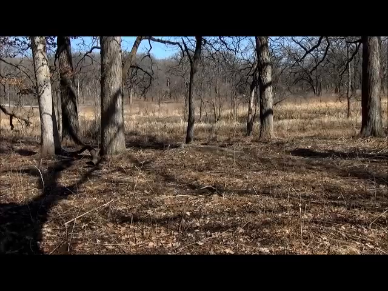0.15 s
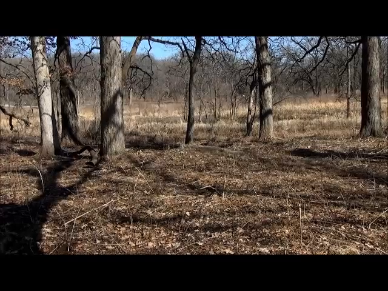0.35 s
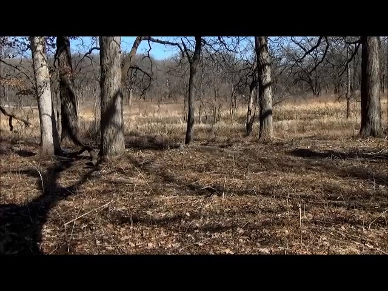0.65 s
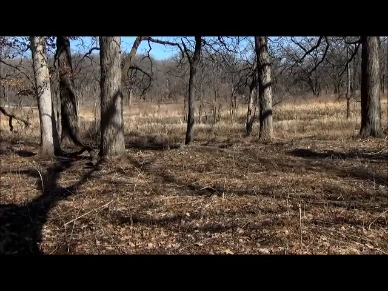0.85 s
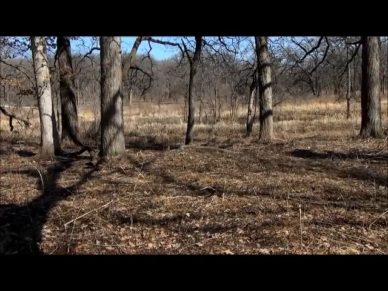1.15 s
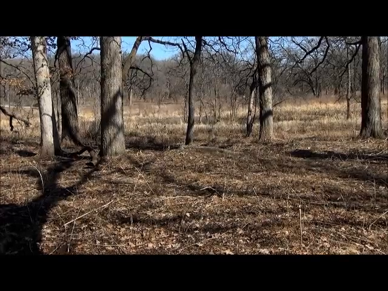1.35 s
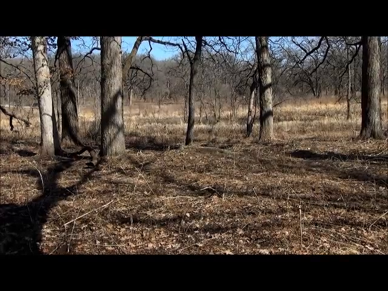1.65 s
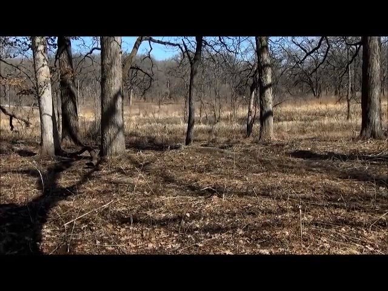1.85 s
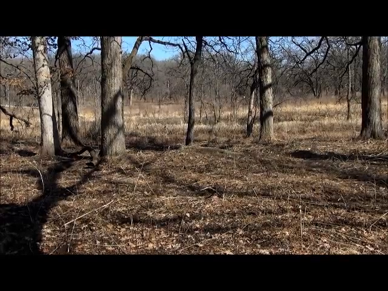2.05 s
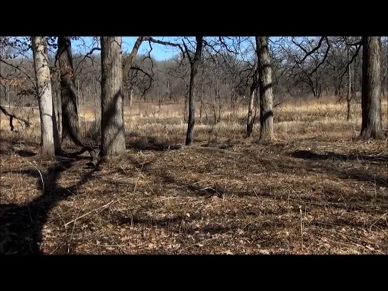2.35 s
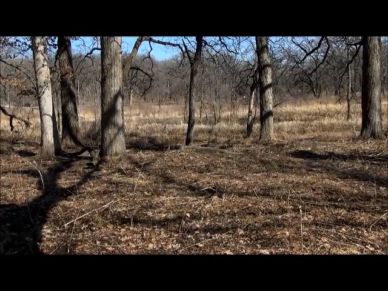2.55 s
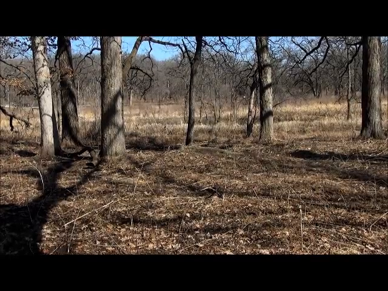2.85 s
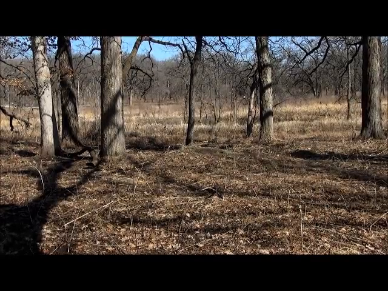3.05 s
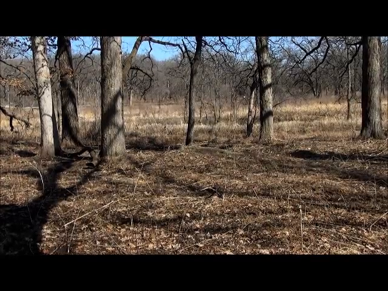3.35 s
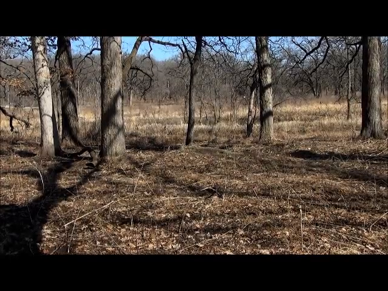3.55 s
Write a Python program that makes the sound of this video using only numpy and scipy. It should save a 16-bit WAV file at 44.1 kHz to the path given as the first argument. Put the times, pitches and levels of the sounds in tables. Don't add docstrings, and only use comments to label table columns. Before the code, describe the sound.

Chorus of small frogs runs the full 3.7 seconds: overlapping creaky trills around 3 to 3.5 kHz, each a string of short pulses slowing and rising in pitch. Strong close pulses stand out near 0, 2.1 and 3.2-3.4 s; scratchier voices enter around 0.5, 2 and 3 s. Distant frogs blur with woodland echo. Low traffic drones with faint engine tones, hiss and tiny leaf ticks; bass leans right.

```python
import sys
import numpy as np
from scipy import signal
from scipy.fft import rfft, irfft
from scipy.io import wavfile
from scipy.ndimage import uniform_filter1d, minimum_filter1d, map_coordinates

SR = 44100
rng = np.random.default_rng(int(sys.argv[2]) if len(sys.argv) > 2 else 0)


def master(y):
    cut = np.clip(np.atleast_2d(y).T, -1, 1)
    pcm = np.round(cut * 32767)
    wavfile.write(sys.argv[1], SR, pcm.astype(np.int16))


def nominal_scale(level):
    x = np.asarray(level, float) / 20
    return 10 ** x


N = 163611
LEAD_IN = SR


def in_time(rows):
    s, value = np.transpose(rows)
    return np.interp(np.arange(N) / SR, s, value)


def coloured(x, points):
    hz, db = np.transpose(points)
    bins_hz = np.maximum(np.arange(N // 2 + 1) * SR / N, 1)
    gain_db = np.interp(np.log(bins_hz), np.log(hz), db)
    return irfft(rfft(x) * nominal_scale(gain_db), N)


def rms_one(x):
    return x / np.sqrt(np.mean(x ** 2) + 1e-20)


def drift(rate_hz):
    knots = rng.standard_normal(400)
    return map_coordinates(knots, [np.arange(N) / SR * rate_hz + 2], order=3)


# multiple [x main partial], level_db [dB]
FOLD_PARTIALS = [(.5, -21.5), (1, 2), (1.5, -29.5), (2, -37), (2.5, -42.5)]
RISE_S, PULSE_SAG_HZ_PER_S = 0.00075, -20000
SLOWING_S, GLIDE_HZ_PER_S = 0.0004, 640
SWELL_DB, PULSE_SCATTER_DB, PULSE_SCATTER_HZ, PARTIAL_SCATTER_DB = 4, 1.5, 28, 3.5
RASP_DB, RASP_S, RASP_MULTIPLE = -25.5, 0.0019, 1.2


def trills(calls, low_db, yield_to=(), scratch_db=0):
    k, t = np.arange(20), np.arange(600) / SR
    first_s, gap_s, pulses, first_hz, db = np.transpose(calls)[:, :, None]
    luck = rng.standard_normal((len(calls), 8, 20))
    since_s = gap_s * k + SLOWING_S * k * k / 2
    start = ((1 + first_s + since_s - 3.5 * RISE_S) * SR).astype(int)
    sounds = (k < np.round(pulses)) & (start < N + LEAD_IN)
    for s in yield_to:
        sounds &= np.abs(start / SR - 1 - s) > 0.004
    luck = luck.transpose(1, 0, 2)[:, sounds, None]

    swell_db = SWELL_DB * (np.sin(np.pi * (k + 1) / (pulses + 1)) - 0.7)
    size = nominal_scale((db + swell_db)[sounds][:, None] + PULSE_SCATTER_DB * luck[1])
    hz = (first_hz + GLIDE_HZ_PER_S * since_s)[sounds][:, None] + PULSE_SCATTER_HZ * luck[0]
    sag_turns = PULSE_SAG_HZ_PER_S * t * (t / 2 - 3 * RISE_S)
    phase = 2 * np.pi * (hz * t + sag_turns) + 9 * luck[2]

    tone = 0
    for j, (multiple, level_db) in enumerate(FOLD_PARTIALS):
        scatter_db = PARTIAL_SCATTER_DB * (j != 1) * luck[3 + j]
        partial_db = level_db + low_db * (multiple < 0.7) + scatter_db
        tone = tone + nominal_scale(partial_db) * np.sin(multiple * phase)
    shape = (t / RISE_S / 3) ** 3 * np.exp(3 - t / RISE_S)
    wave = size * shape * tone

    breath = rng.standard_normal(wave.shape)
    breath = uniform_filter1d(uniform_filter1d(breath, size=8), size=3)
    puff = nominal_scale(RASP_DB + scratch_db + PULSE_SCATTER_DB * luck[7]) * np.exp(-((t - 0.002) / RASP_S) ** 2)
    wave += size * puff * np.sin(RASP_MULTIPLE * phase) * breath

    places = start[sounds][:, None] + np.arange(len(t))
    total = N + LEAD_IN
    return np.bincount(places.ravel(), wave.ravel(), total + len(t))[:total]


# start_s [s], gap_s [s], pulses [count], pitch_hz [Hz], peak_db [dB]
NEAR_CALLS = [(0.0352, 0.0377, 7, 3375.0, -7.4), (0.0451, 0.0431, 5, 3525.0, -6.7),
              (0.09, 0.0356, 11, 3075.0, -11.0), (0.3215, 0.0386, 13, 3225.0, -8.6),
              (0.3365, 0.0365, 7, 3275.0, -7.1), (0.5799, 0.0377, 5, 3525.0, -8.4),
              (0.8154, 0.0398, 14, 3200.0, -10.0), (1.0244, 0.0371, 13, 3225.0, -10.2),
              (1.0454, 0.0485, 6, 3575.0, -9.7), (1.2998, 0.0383, 19, 3125.0, -10.2),
              (1.3891, 0.0482, 13, 3275.0, -12.1), (1.4225, 0.0431, 4, 3525.0, -9.4),
              (1.4904, 0.0353, 11, 3300.0, -10.2), (1.7119, 0.0446, 13, 3025.0, -9.6),
              (1.9039, 0.053, 9, 3125.0, -7.8), (1.9713, 0.0428, 11, 3325.0, -7.6),
              (2.2531, 0.0371, 8, 3200.0, -7.2), (2.3015, 0.0371, 20, 3175.0, -9.9),
              (2.4542, 0.0368, 16, 3225.0, -9.9), (2.5046, 0.0398, 10, 3150.0, -9.4),
              (2.6517, 0.0518, 17, 3100.0, -10.7), (3.0972, 0.0407, 13, 3200.0, -7.6),
              (3.1187, 0.0401, 10, 3075.0, -10.6), (3.2988, 0.0419, 10, 3225.0, -8.8)]
# start_s [s], gap_s [s], pulses [count], pitch_hz [Hz], peak_db [dB]
DEEP_CALLS = [(.075, .045, 4, 2960, -15), (.561, .04, 5, 2930, -16), (.86, .044, 5, 2940, -16),
              (1.72, .048, 4, 2900, -13), (2.618, .046, 5, 2970, -16), (3.001, .0425, 8, 2830, -11),
              (3.56, .043, 4, 2880, -18)]
# start_s [s], gap_s [s], pulses [count], pitch_hz [Hz], peak_db [dB]
SCRATCHY_CALLS = [(.513, .0425, 9, 3500, -13), (1.967, .0435, 9, 3520, -14), (2.735, .045, 6, 3560, -13),
                  (3.132, .043, 10, 3500, -12)]
# start_s [s], peak_db [dB], pitch_hz [Hz]
ACCENT_PULSES = [(0.0437, -1, 3434), (0.13, -5, 3550), (0.188, -6, 3440), (0.2279, -4.5, 3550),
                 (0.3722, -7.5, 3300), (0.42, -3, 3170), (0.4828, -3.5, 3425), (0.6417, -8, 3330),
                 (0.7724, -8, 3600), (1.2116, -5, 3390), (1.3636, -5.5, 3440), (1.4132, -7, 3525),
                 (1.8228, -2.5, 3570), (2.0607, -2, 3420), (2.099, 2, 3370), (2.143, 1.5, 3390),
                 (2.212, -7, 3350), (2.2737, -11.5, 3480), (2.3251, -2, 3430), (2.4012, -8.5, 3390),
                 (2.4419, -4.5, 3410), (2.4803, -5.5, 3330), (2.5425, -7, 3230), (2.7749, -5, 3340),
                 (2.8225, -4, 3430), (2.9881, -6.5, 3595), (3.1763, -3, 3270), (3.2218, -0.5, 3370),
                 (3.3922, 1, 3420), (3.5545, -3.5, 3485)]


def near_frogs():
    accent_times_s = [s for s, _, _ in ACCENT_PULSES]
    accents = [(s + 3 * RISE_S, 1, 1, hz, db - 1.5) for s, db, hz in ACCENT_PULSES]
    near = nominal_scale(-0.5) * trills(NEAR_CALLS + DEEP_CALLS, low_db=-6.5, yield_to=accent_times_s)
    near += trills(SCRATCHY_CALLS, low_db=-5.5, scratch_db=16)
    near += trills(accents, low_db=-6.0, scratch_db=-0.5)
    return near


def callers(count, centre_hz, spread_hz, spread_db):
    u, g = rng.random((count, 3)), rng.standard_normal((count, 2))
    first_s = -0.95 + (np.arange(count) + u[:, 0]) / count * (N / SR + 0.95)
    gap_s = 0.036 + 0.014 * u[:, 1]
    pulses = 11 + 8 * u[:, 2]
    pitch_hz = centre_hz + spread_hz * np.clip(g[:, 0], -1.6, 1.6)
    return np.transpose([first_s, gap_s, pulses, pitch_hz, spread_db * g[:, 1]])


def crowd_frogs():
    calls = callers(count=70, centre_hz=3092, spread_hz=163, spread_db=1.5)
    return nominal_scale(-19.5) * rms_one(trills(calls, low_db=1.0))


def far_frogs():
    calls = callers(count=150, centre_hz=3081, spread_hz=200.4, spread_db=3.0)
    return nominal_scale(-23) * rms_one(trills(calls, low_db=7))


def among_trunks(x):
    t60_s = 0.34
    t = np.arange(SR // 2) / SR
    tail = rng.standard_normal(len(t)) * nominal_scale(-60 * t / t60_s) * (t > 0.006)
    return signal.fftconvolve(x, tail / np.sqrt(np.sum(tail ** 2)))[LEAD_IN:N + LEAD_IN]


# time_s [s], level_db [dB]
MARSH_EFFORT = [(0.0, -15.5), (0.31, -18.5), (0.62, -17), (0.78, -19), (1.31, -18), (1.76, -20),
                (1.97, -15.5), (2.31, -21.5), (2.59, -17.5), (3.38, -16), (3.51, -20), (3.71, -23)]


def marsh_effort_db():
    effort_db = in_time(MARSH_EFFORT)
    return effort_db - np.mean(effort_db)


# freq_hz [Hz], gain_db [dB]
SAC_COLOUR = [(1500, -5.5), (2000, 3), (2500, -3), (2900, -3), (3800, 0), (4400, -4.5), (5400, 1.5),
              (7500, -4.5), (12000, -8)]
TRUNKS_DB = -10.5


def frogs():
    near, crowd, far = near_frogs(), crowd_frogs(), far_frogs()
    behind = crowd[LEAD_IN:] + among_trunks(nominal_scale(TRUNKS_DB) * crowd + far)
    front = near[LEAD_IN:] + nominal_scale(TRUNKS_DB) * among_trunks(near)
    return coloured(front + nominal_scale(marsh_effort_db()) * behind, SAC_COLOUR)


# time_s [s], level_db [dB]
ROAD_SWELL = [(0.0, -22.5), (0.41, -23.5), (0.53, -22.5), (0.85, -26), (1.9, -23.5), (1.92, -22.5),
              (2.19, -24.5), (3.23, -21.5), (3.58, -26.5), (3.71, -26)]
# freq_hz [Hz], density_db [dB per Hz]
TYRE_COLOUR = [(15, -41), (25, -20.5), (59, -1), (91, -4), (128, -2), (231, -4.5), (532, -2), (1070, -8.5),
               (1450, -17), (1880, -50), (3190, -120)]


def tyre_roar():
    roar = rms_one(coloured(rng.standard_normal(N), TYRE_COLOUR))
    return nominal_scale(in_time(ROAD_SWELL) + 1.1 * drift(6.23)) * roar


# from_s [s], to_s [s], pitch_hz [Hz], throb_hz [Hz], level_db [dB]
ENGINE_TONES = [(.36, .85, 355, 3.9, -30), (-.2, .35, 356, 3.1, -37), (2.44, 2.86, 516, 2.4, -31),
                (.45, 1.4, 555, 3.1, -35), (1.75, 3.5, 62, 3.2, -32), (1.9, 2.5, 535, 3.3, -36)]


def engines():
    fade_s, throb_depth, wander = 0.092, 0.61, 0.007
    t, out = np.arange(N) / SR, np.zeros(N)
    for from_s, to_s, hz, throb_hz, db in ENGINE_TONES:
        fade = np.clip(np.minimum(t - from_s, to_s - t) / fade_s, 0, 1)
        throb = 1 - throb_depth * np.cos(2 * np.pi * throb_hz * (t - from_s))
        phase = 2 * np.pi * hz * np.cumsum(1 + wander * drift(7.0)) / SR
        out += nominal_scale(db) * fade * throb * np.sin(phase)
    return out


# time_s [s], peak_db [dB]
LEAF_TICKS = [(0.5955, -43), (0.6373, -44), (0.6843, -45), (0.9888, -52), (1.1298, -45), (1.5597, -42),
              (2.329, -41), (2.4164, -37), (2.426, -43.5), (3.4115, -44), (3.458, -43)]


def leaves():
    centre_hz, tick_s = 10500, 0.003
    t = np.arange(N) / SR
    gate = sum(nominal_scale(db) * np.exp(-((t - s - tick_s) / tick_s) ** 2) for s, db in LEAF_TICKS)
    band = signal.butter(2, [centre_hz * 0.68, centre_hz * 1.1], "band", fs=SR, output="sos")
    return signal.sosfilt(band, gate * rng.standard_normal(N))


# freq_hz [Hz], density_db [dB per Hz]
HISS_COLOUR = [(1500, -3.5), (2400, 3.5), (4300, -1), (6000, -2), (8000, -13.5), (11000, -14.5),
               (16000, -19.5)]


def hiss():
    noise = rms_one(coloured(rng.standard_normal(N), [(600, -52)] + HISS_COLOUR))
    return noise * nominal_scale(-45 + 0.65 * marsh_effort_db())


# pitch_hz [Hz], rms_db [dB]
WHINE_TONES = [(12290, -89.5), (13248, -80.5), (15106, -82), (15165, -88)]


def whines():
    t = np.arange(N) / SR
    return sum(np.sqrt(2) * nominal_scale(db) * np.sin(2 * np.pi * hz * t) for hz, db in WHINE_TONES)


def port_noise():
    lowpass = signal.butter(8, 900, fs=SR, output="sos")
    return nominal_scale(-50.5) * rms_one(signal.sosfilt(lowpass, rng.standard_normal(N)))


# freq_hz [Hz], level_db [dB]
CHANNEL_LEAN = [(60, -5), (110, -6.5), (200, -1.5), (380, -3.5), (700, -4), (1290, -1.9), (3000, -2.2),
                (4200, -1.5), (6000, 0.5)]


def scene():
    field = frogs() + tyre_roar() + engines() + leaves() + hiss() + whines()
    hz, db = np.transpose(CHANNEL_LEAN)
    side_ratio = np.abs(np.tanh(np.log(10) / 40 * db))
    side_db = 20 * np.log10(side_ratio + 1e-4)
    side = coloured(field, np.transpose([hz, side_db])) + port_noise()
    return np.array([field - side, field + side])


def roll_off(x):
    return signal.sosfilt(signal.butter(12, 15640, fs=SR, output="sos"), x)


def record(dry):
    limit, span = 0.97, int(0.003 * SR)
    peak = np.abs(dry).max(axis=0).clip(1e-9)
    need = minimum_filter1d(np.minimum(1, limit / peak), size=2 * span)
    held = dry * uniform_filter1d(uniform_filter1d(need, size=span), size=span)
    lowpass = signal.ellip(12, 0.2, 60, 15900, fs=SR, output="sos")
    return roll_off(signal.sosfilt(lowpass, held))


dry = scene()
out = record(dry)
master(out)
```